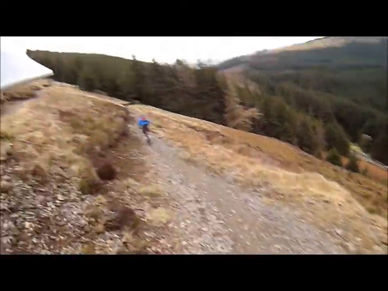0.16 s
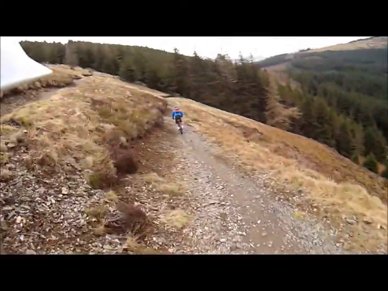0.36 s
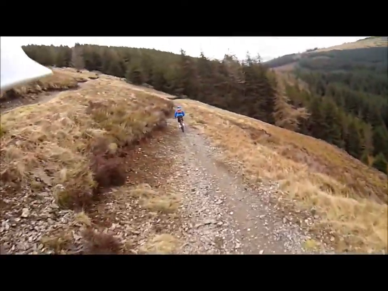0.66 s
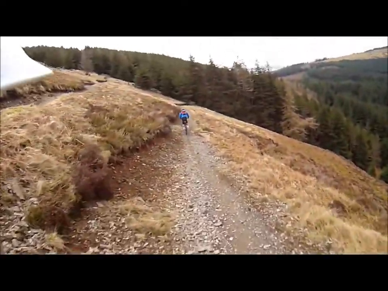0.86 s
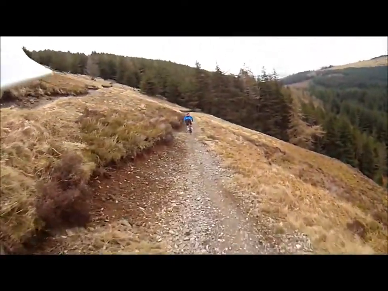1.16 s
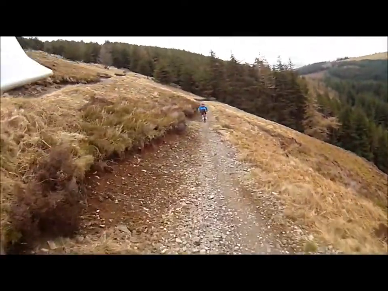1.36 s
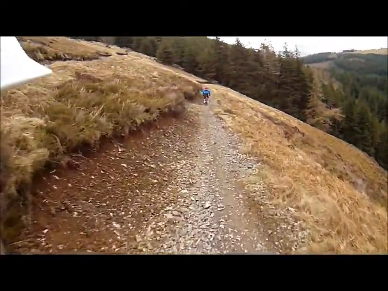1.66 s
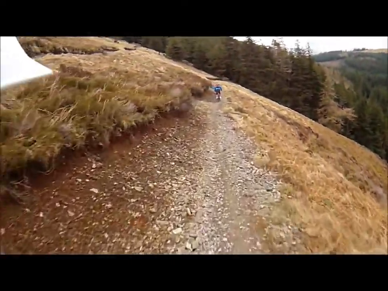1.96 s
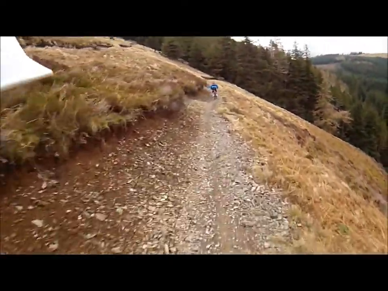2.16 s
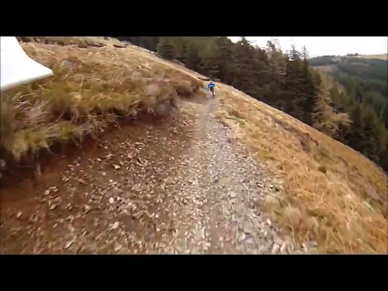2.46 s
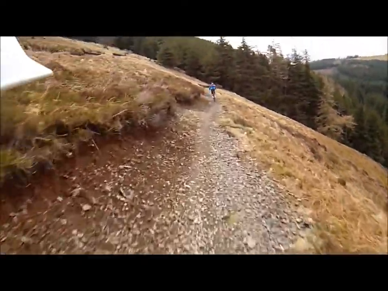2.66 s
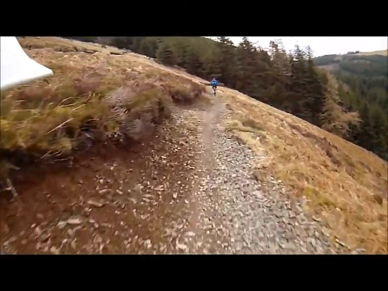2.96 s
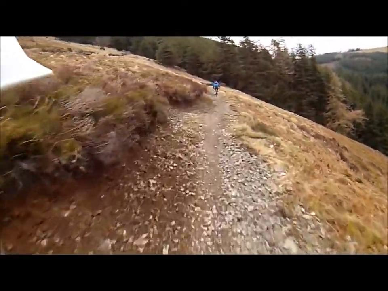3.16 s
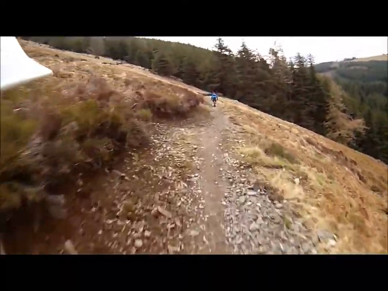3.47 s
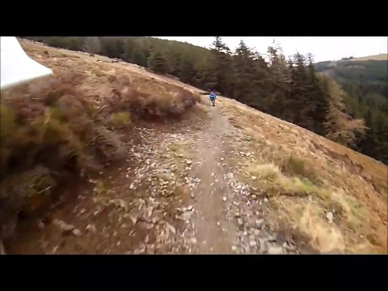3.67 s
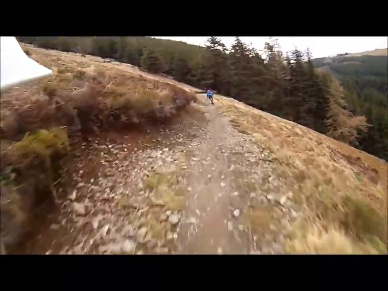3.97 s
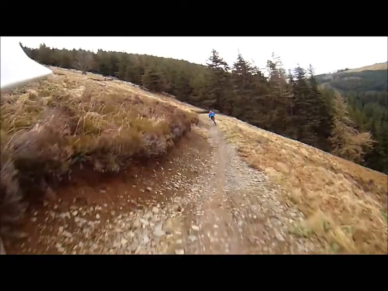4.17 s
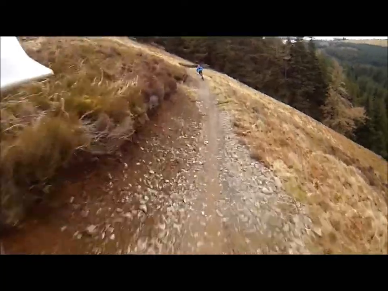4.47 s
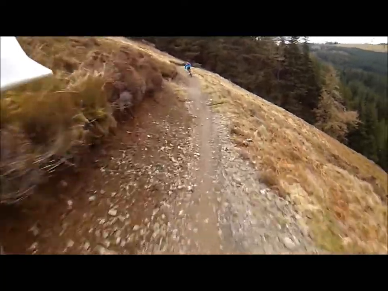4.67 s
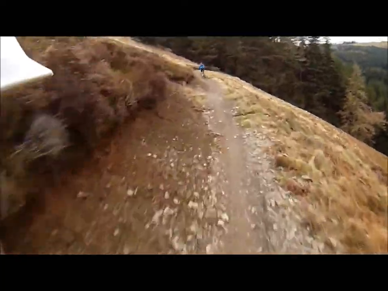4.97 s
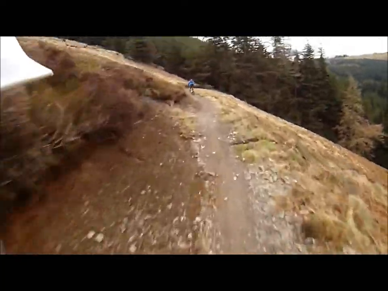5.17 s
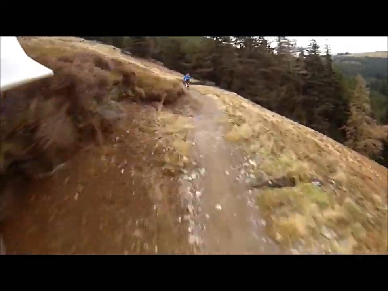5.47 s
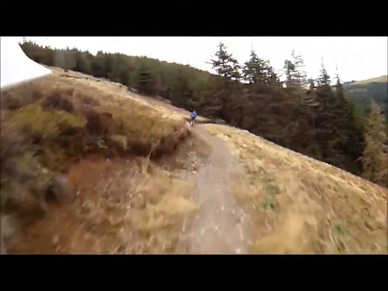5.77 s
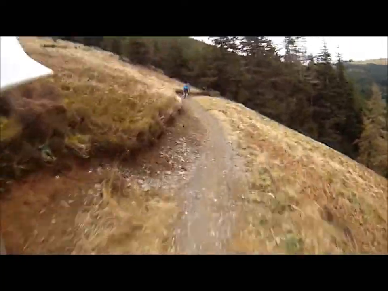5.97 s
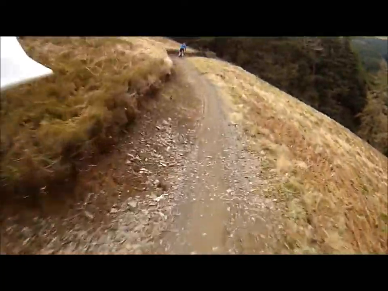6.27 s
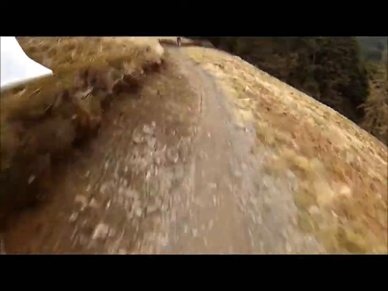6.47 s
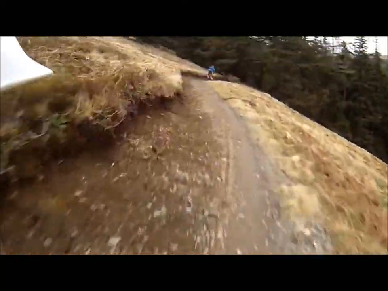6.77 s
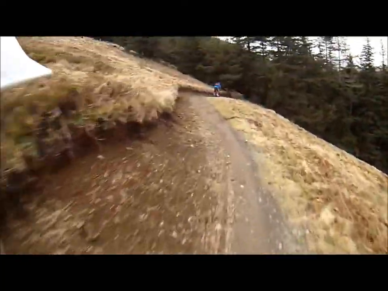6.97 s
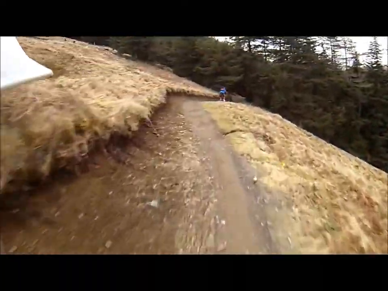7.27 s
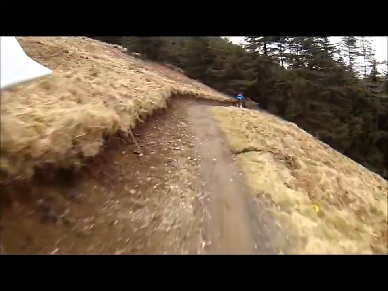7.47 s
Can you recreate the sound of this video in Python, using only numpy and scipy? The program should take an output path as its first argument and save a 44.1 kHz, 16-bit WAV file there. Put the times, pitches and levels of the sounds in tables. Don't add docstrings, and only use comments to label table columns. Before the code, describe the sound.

Heard from a helmet camera in a plastic case, a mountain bike rolls down an open hillside gravel trail. Quiet crunching and a thin ticking freewheel come first, then rougher, faster grinding with pebbles knocking the frame. Wind rumbles in gusts over faint hiss. Very loud stone cracks jump out midway and near the end, with a hard braking skid between them.

```python
import sys
import numpy as np
from scipy import signal
from scipy.fft import rfft, irfft
from scipy.io import wavfile
from scipy.ndimage import uniform_filter1d

SR = 44100
rng = np.random.default_rng(int(sys.argv[2]) if len(sys.argv) > 2 else 0)


def dump_mix(stems):
    frames = np.atleast_2d(stems).T
    limited = np.clip(frames, -1, 1)
    pcm = np.round(limited * 32767).astype(np.int16)
    wavfile.write(sys.argv[1], SR, pcm)


def elevation(decibels):
    levels = np.asarray(decibels, float)
    return 10 ** (levels / 20)


N = 336042
T = np.arange(N) / SR

# time in seconds, crunch level in dB.
CRUNCH = [(0.0, -65.5), (1.31, -66.5), (1.66, -61.5), (2.1, -59.5), (2.63, -60.5), (3.4, -55.5),
          (4.03, -56), (4.39, -59), (4.69, -60.5), (4.86, -52), (5.07, -53.5), (5.92, -56), (6.09, -59),
          (6.28, -58), (6.51, -54.5), (6.88, -51.5), (7.03, -53.5), (7.62, -56)]
# middle in seconds, swell in dB, half length in seconds.
SLIDES = [(0.316, 9.5, 0.039), (1.538, 2.5, 0.033), (1.935, 8, 0.0047), (2.09, 5.5, 0.02),
          (3.106, 11.5, 0.0077), (3.179, 5.5, 0.0094), (3.345, 5.5, 0.011), (3.435, 2, 0.011),
          (3.59, 4.5, 0.0084), (3.979, 7, 0.0036), (4.13, 6, 0.038), (4.693, 12, 0.051),
          (4.888, 1.5, 0.0086), (5.171, 11.5, 0.011), (5.275, 3, 0.0066), (5.85, 7.5, 0.011),
          (5.95, -0.5, .06), (6.423, 4.5, 0.053), (6.77, 2.5, 0.029)]
# frequency in Hz, width in Hz, level in dB.
CASE_LOW = [(1250, 370, -1), (1550, 510, 11.5), (1927, 160, -10)]
CASE_HIGH = [(2390, 290, 1.5), (2796, 250, 4), (3990, 350, 0.5), (4920, 73, -7.5)]
CASE_TOP = [(4900, 900, -10), (6900, 1500, 0), (9300, 530, -6), (11500, 2400, -13)]
# time in seconds, rush level in dB.
SPEED = [(0.0, -60), (2.06, -59.5), (2.16, -59), (3.22, -55), (4.05, -56.5), (6.15, -52), (6.43, -53),
         (7.0, -52.5), (7.62, -55)]
# middle in seconds, swell in dB, half length in seconds.
SKIDS = [
    (0, 9, .1),
    (2.04, 3, .08),
    (4.2, 4.5, 0.72),
    (5.95, 13, 0.13),
    (6.25, 4.5, .15),
    (7.0, 4, 0.19),
]
# middle in seconds, swell in dB, half length in seconds.
GUSTS = [(.06, 6, .04), (.6, 4, 0.26), (2.07, 12, 0.11), (2.55, 8, 0.31), (3.35, 9.5, 0.23),
         (3.95, 14, 0.19), (4.2, 8, 0.074), (4.76, 21, 0.043), (4.92, 10.5, 0.11), (5.3, 10, 0.74),
         (5.95, 10, 0.089), (6.08, 9, 0.029), (6.43, 3.5, 0.04), (6.7, 18, 0.15), (6.92, 8, 0.058),
         (7.15, 2, 0.024), (7.43, 6, 0.029)]
# frequency in Hz, density in dB per Hz.
BUFFET_SPECTRUM = [(4, -46), (7, 5), (22, 3), (31, -9), (40, -10.5), (55, -26), (90, -81.5)]
RUSH_SPECTRUM = [(22, -26), (38, -7.5), (54, -11.5), (91, -16), (151, -24.5), (309, -30.5), (700, -45.5),
                 (910, -70), (1540, -120)]
HISS_SPECTRUM = [(300, -24.5), (2000, -34), (6000, -33), (10000, -29), (16000, -31)]
# frequency in Hz, width in Hz, level in dB.
TYRE_MODES = [(122, 27, -6.5), (150.3, 26.5, -0.5)]
# start in seconds, peak in dB, ring in Hz.
KNOCKS = [(0.9532, -41, 1540), (0.9674, -39.5, 1480), (0.9992, -31.5, 1550), (1.6544, -37, 1350),
          (1.8043, -34.5, 1460), (2.1614, -30, 1750), (2.3245, -32.5, 1540), (2.383, -38, 1410),
          (2.597, -43, 1610), (2.9219, -38.5, 1580), (3.044, -25.5, 1750), (3.276, -35.5, 1530),
          (3.3909, -32, 1530), (3.4454, -33.5, 1440), (3.6298, -36, 1350), (3.7489, -35, 1690),
          (3.9727, -35.5, 1470), (4.4893, -38, 1340), (4.688, -34, 1510), (4.883, -36.5, 1650),
          (4.9516, -33, 1240), (5.0487, -30, 1460), (5.1102, -31, 1540), (5.1642, -27.5, 1540),
          (5.3359, -31.5, 1420), (5.476, -35.5, 1250), (5.5426, -33.5, 1420), (6.688, -35, 1360),
          (6.789, -29, 1440), (7.067, -28.5, 1390)]
# start in seconds, peak in dB.
TAPS = [(0.0054, -41.5), (0.3431, -48), (0.7168, -43.5), (1.5342, -43), (1.9305, -40), (2.0228, -42),
        (2.095, -46), (2.46, -50), (2.5226, -40.5), (2.6239, -45), (2.693, -41.5), (3.1844, -38),
        (3.5803, -43), (4.0604, -36.5), (4.723, -40), (4.8199, -39), (4.8372, -42), (5.036, -37),
        (5.0883, -39), (5.2673, -37), (5.6155, -37.5), (5.679, -36), (6.338, -36), (6.388, -35.5),
        (6.7645, -33), (6.7793, -30), (7.1757, -35), (7.3798, -37), (7.4674, -41), (7.547, -46)]
# time in seconds, teeth passed.
RATCHET = [(.015, 0), (.105, 2), (.185, 5), (.305, 8), (.485, 13), (.568, 15), (.717, 18), (.878, 22),
           (.936, 24), (1.11, 31), (1.2, 34), (1.297, 38), (1.61, 50)]
# frequency in Hz, level in dB, ring time in seconds.
PAWL_MODES = [(4200, 0, 0.017), (7170, -1, 0.014), (9000, -5.5, 0.0087)]
# start in seconds, peak in dB, centre in Hz.
CHIPS = [(0.184, -53.5, 5100), (1.1962, -61, 7300), (2.0036, -48.5, 5190), (2.0956, -54, 5070),
         (2.161, -47.5, 6600), (2.3254, -50.5, 5070), (2.6234, -56, 5250), (3.097, -39.5, 4720),
         (3.1084, -50, 5220), (3.224, -55, 5080), (3.275, -51, 5240), (3.3912, -47.5, 6680),
         (3.477, -50, 5020), (3.6303, -40.5, 5080), (3.8292, -57, 7160), (3.909, -52, 5610),
         (4.4687, -56, 5780), (4.6869, -40.5, 5030), (4.739, -47, 6900), (4.8204, -36.5, 5800),
         (4.9562, -55, 5100), (5.0478, -42, 5160), (5.1696, -41, 6470), (6.3362, -47, 5400),
         (6.3844, -56, 5100), (6.4258, -56, 7400), (6.4378, -50, 5190), (6.79, -47, 6950),
         (7.437, -54, 6660)]
# start in seconds, peak in dB, centre in Hz.
PINGS = [
    (5.1936, -50, 8100),
    (5.444, -51, 9200),
    (6.4916, -47, 10300),
    (6.5854, -58, 10300),
    (6.6378, -49, 9980),
]
# start in seconds, peak in dB, ring in Hz, ring time in seconds.
TINKS = [
    (.237, -59, 3000, .02),
    (1.3597, -47.5, 1890, 0.031),
    (1.376, -52, 1850, .02),
]
# start in seconds, peak in dB, ring in Hz, ring time in seconds.
THUDS = [
    (3.013, -40, 480, 0.015),
    (6.011, -36.5, 956, 0.023),
    (6.04, -41.5, 710, 0.017),
    (3.662, -38.5, 219, 0.01),
    (4.101, -38.5, 85, 0.04),
    (4.36, -45, 90.5, 0.083),
    (4.755, -38.5, 45, .1),
    (6.075, -33.5, 48, 0.13),
]
# start in seconds, peak in dB, contact in seconds.
CRACKS = [
    (3.6619, -1, .00005),
    (4.1005, -7, 0.0003),
    (5.3805, -13, 0.00034),
    (7.0128, 0.6, 0.00015),
]
# frequency in Hz, level in dB, ring time in seconds.
CRACK_1_MODES = [(837, -42, 0.021), (1240, -33, 0.015), (1750, -34, 0.01), (2220, -38, .012),
                 (2877, -31.5, 0.011), (3830, -34.5, 0.0077), (4830, -37, 0.0038), (6630, -43, 0.0044),
                 (7790, -44.5, 0.0045), (9760, -47, 0.0026), (11700, -52, 0.0028), (13600, -56, 0.0022),
                 (14700, -56, .003)]
CRACK_2_MODES = [(160, -24, 0.11), (457, -43, 0.075), (802, -36, 0.043), (1040, -37.5, 0.022),
                 (1240, -32.5, 0.021), (1580, -33.5, 0.011), (1920, -36, 0.011), (2750, -41.5, 0.014),
                 (3180, -42, 0.0092), (3680, -44, 0.0083), (4770, -63, 0.0092), (5800, -77, .004),
                 (6750, -72, 0.0076)]
CRACK_3_MODES = [(1250, -38.5, 0.005), (1750, -28.5, 0.0061), (2320, -36, 0.0076), (2900, -41, 0.012),
                 (4140, -71, .008)]
CRACK_4_MODES = [(1150, -37, 0.022), (1540, -37.5, 0.009), (2073, -21, 0.011), (2940, -25, 0.005),
                 (3580, -38.5, 0.011), (4490, -29, 0.0038), (5870, -36.5, 0.0042), (6620, -33, 0.0028),
                 (7860, -47, 0.0031), (9000, -53, 0.0053), (10600, -53, 0.0078), (11800, -46.5, .003),
                 (14600, -52, .004), (15800, -63, .003)]

GRIT_DB, GRIT_DB_PER_DB = -67.5, 0.83
SPRAY_DB, SPRAY_DB_PER_DB = -79.5, 0.61
PEBBLES_PER_S, PEBBLE_DB = 140, -5
SKID_DB, SKID_DB_PER_DB = -72, 0.9
BUFFET_DB, BUFFET_DB_PER_DB = -49.5, 0.17
GUST_RUSH_SHARE = 0.05
TYRE_DB, TYRE_RISE_DB_PER_S = -74, 2.3
MOUNT_HZ, MOUNT_DB = 59.8, -65.5
TAP_HZ, TAP_SPREAD_RATIO, KNOCK_CONTACT_S = 1437, 0.02, 0.00035
BOUNCE_S, BOUNCE_DB = 0.005, -11
PAWL_DB, PAWL_SPREAD_DB = -64, 2
CHIP_S, CHIP_WIDTH_HZ = 0.016, 1360
CHIP_CASE_DB, CHIP_LOUD_DB = -4, -51
CHIP_DRY_DB_PER_DB = 0.46
CASE_HOLLOW_HZ, CRACK_HOLLOW_HZ, CRACK_LOW_HZ = 3510, 3130, 600
HISS_DB, WHINE_HZ, WHINE_DB = -76.5, 7630, -81
CLIP_PEAK, TOP_HZ = 0.99, 15750


def unit(x):
    return x / np.sqrt(np.mean(x ** 2))


def curve(table):
    s, db = np.transpose(table)
    return np.interp(T, s, db)


def swells(table):
    return sum(db * np.exp(-((T - s) / half_s) ** 2) for s, db, half_s in table)


def walk(rate_hz):
    hold = int(SR / rate_hz)
    steps = np.repeat(rng.standard_normal(N // hold + 1), hold)
    return 1.48 * uniform_filter1d(uniform_filter1d(steps, hold), hold)[:N]


def coloured(spectrum):
    hz, db = np.transpose(spectrum)
    f = np.arange(N // 2 + 1) * SR / N + 0.0017
    gain = elevation(np.interp(np.log(f), np.log(hz), db))
    return unit(irfft(rfft(rng.standard_normal(N)) * gain, N))


def resonate(x, modes):
    f = np.arange(N // 2 + 1) * SR / N + 1e-3
    gain = 0
    for hz, width_hz, db in modes:
        detune = (f / hz - hz / f) * hz / (1.62 * width_hz)
        gain = gain + elevation(db) / (1 + 1j * detune) ** 2
    return unit(irfft(rfft(x) * gain, N))


def hollow(x, hz, sharpness, depth):
    notched = signal.lfilter(*signal.iirnotch(hz, sharpness, fs=SR), x)
    return (1 - depth) * x + depth * notched


def ring(modes, contact_s):
    t = T[:SR // 12]
    y = np.zeros(len(t))
    for k, (hz, db, t60_s) in enumerate(modes):
        decay = np.exp(-np.log(1000) * t / t60_s)
        y += (-1) ** k * elevation(db) / t60_s * decay * np.sin(2 * np.pi * hz * t)
    y = y * (1 - np.exp(-t / contact_s))
    return y / np.max(np.abs(y))


def scratch(noise, hz, width_ratio, length_s):
    edges_hz = [(1 - width_ratio) * hz, (1 + width_ratio) * hz]
    band = signal.butter(2, edges_hz, "bandpass", fs=SR, output="sos")
    t = T[:len(noise)]
    envelope = np.exp(-np.log(1000) * t / length_s) * (1 - np.exp(-t / 0.00023))
    y = signal.sosfilt(band, noise) * envelope
    return y / np.max(np.abs(y))


def add(out, s, sound):
    i = int(s * SR)
    out[i:i + len(sound)] += sound[:N - i]


def grains(per_s, spread_db, length_s, smooth):
    hit = rng.random(N) < per_s / SR
    sizes = hit * elevation(spread_db * np.minimum(rng.exponential(size=N), 3.2))
    bursts = signal.lfilter([1], [1, -np.exp(-1 / (length_s * SR))], sizes)
    return rng.standard_normal(N) * (unit(bursts) + smooth)


def gravel():
    crunch_db, slide_db = curve(CRUNCH), swells(SLIDES)
    grit_db = GRIT_DB + GRIT_DB_PER_DB * (crunch_db + 57.5)
    spray_db = SPRAY_DB + SPRAY_DB_PER_DB * (crunch_db + 60.5)
    stones = unit(grains(per_s=340, spread_db=2.5, length_s=0.0011, smooth=1.5))
    sand = unit(grains(per_s=270, spread_db=1.0, length_s=0.0038, smooth=0.35))
    pebbles = unit((rng.random(N) < PEBBLES_PER_S / SR) * rng.uniform(-1.02, 1, size=N))
    patch_db = 0.62 * walk(30)
    crunch = resonate(stones + elevation(PEBBLE_DB) * pebbles, CASE_LOW)
    crunch *= elevation(crunch_db + slide_db + 1.35 + 1.76 * walk(70))
    grit = resonate(0.3 * stones + 0.12 * pebbles + sand, CASE_HIGH)
    grit *= elevation(grit_db + 0.71 * slide_db - 0.34)
    spray = resonate(0.168 * stones + sand, CASE_TOP)
    spray *= elevation(spray_db + 0.4 * slide_db + 1.7)
    return elevation(patch_db) * (crunch + grit + spray)


def skid():
    skid_db = SKID_DB + SKID_DB_PER_DB * (curve(SPEED) + 54.5) + swells(SKIDS)
    modes = [(410, 210, -1.0), (578, 580, 0.24), (920, 650, -1.2)]  # Hz, width Hz, dB
    return resonate(rng.standard_normal(N), modes) * elevation(skid_db + 2.0)


def wind():
    speed_db, gust_db = curve(SPEED), swells(GUSTS)
    rush_db = speed_db + GUST_RUSH_SHARE * gust_db + 1.0
    buffet_db = BUFFET_DB + BUFFET_DB_PER_DB * (speed_db + 56.5) + gust_db
    rush = coloured(RUSH_SPECTRUM) * elevation(rush_db + 2.5 + 1.0 * walk(23))
    return coloured(BUFFET_SPECTRUM) * elevation(buffet_db + 5.0) + rush


def tyres():
    drone_db = TYRE_DB + TYRE_RISE_DB_PER_S * T + 1.65 * walk(6.6)
    drone = resonate(rng.standard_normal(N), TYRE_MODES) * elevation(drone_db)
    hum = resonate(rng.standard_normal(N), [(MOUNT_HZ, 7, 0)]) * elevation(MOUNT_DB)
    return drone + hum


def knocks():
    out = np.zeros(N)
    hits = list(KNOCKS)
    for (s, db), chance in zip(TAPS, rng.standard_normal(len(TAPS))):
        hits.append((s, db, TAP_HZ * (1 + TAP_SPREAD_RATIO * chance)))
    bounces = []
    for (s, db, hz), (a, b) in zip(hits, rng.random((len(hits), 2))):
        bounces.append((s + BOUNCE_S * (0.609 + a), db + BOUNCE_DB - 6 * b, hz * (0.95 + 0.2 * b)))
    for s, db, hz in hits + bounces:
        modes = [(0.8 * hz, -7, 0.009), (hz, 0, 0.011), (1.196 * hz, -5, 0.009),
                 (2850, -17, 0.009), (4050, -29, 0.008)]
        add(out, s + 0.0006, elevation(db - 0.4) * ring(modes, KNOCK_CONTACT_S))
    return out


def freewheel():
    out, tick = np.zeros(N), ring(PAWL_MODES, 0.00017)
    s, teeth = np.transpose(RATCHET)
    times = np.interp(np.arange(teeth[-1]), teeth, s)
    for start, chance in zip(times, rng.standard_normal(len(times))):
        add(out, start, elevation(PAWL_DB + PAWL_SPREAD_DB * chance) * tick)
    return out


def chips():
    out = np.zeros(N)
    hits = list(CHIPS) + list(PINGS)
    for (s, db, hz), noise in zip(hits, rng.standard_normal((len(hits), SR // 20))):
        case_db = CHIP_CASE_DB - CHIP_DRY_DB_PER_DB * (db - CHIP_LOUD_DB) - 9 * (hz > 8000)
        case = scratch(noise, 4100, 0.081, 1.2 * CHIP_S)
        case += 0.39 * scratch(noise, 2900, 0.29, 0.55 * CHIP_S)
        chip = scratch(noise, hz, CHIP_WIDTH_HZ / hz, CHIP_S) + elevation(case_db) * case
        add(out, s + 0.00041, elevation(db - 1.3) * chip)
    return out


def tinks():
    out = np.zeros(N)
    for s, db, hz, t60_s in TINKS:
        add(out, s, elevation(db) * ring([(hz, 0, t60_s)], 0.0012))
    return out


def thuds():
    out = np.zeros(N)
    for s, db, hz, t60_s in THUDS:
        modes = [(hz, 0, t60_s), (1.7 * hz, -3, t60_s)]
        add(out, s, elevation(db + 1.0) * ring(modes, 0.00053))
    return out


def cracks():
    out = np.zeros(N)
    stones = (CRACK_1_MODES, CRACK_2_MODES, CRACK_3_MODES, CRACK_4_MODES)
    for (s, db, contact_s), modes in zip(CRACKS, stones):
        add(out, s, elevation(db) * ring(modes, contact_s))
    out = signal.sosfilt(signal.butter(2, CRACK_LOW_HZ, "highpass", fs=SR, output="sos"), out)
    out = hollow(out, CRACK_LOW_HZ, 3.7, depth=0.53)
    return hollow(out, CRACK_HOLLOW_HZ, 18, depth=0.7)


def scene():
    ground = hollow(gravel() + skid(), CASE_HOLLOW_HZ, 4.2, depth=0.36)
    air = wind() + tyres()
    strikes = knocks() + freewheel() + chips() + tinks() + thuds() + cracks()
    return (ground + air + strikes)[None]


def low_pass(x):
    return signal.sosfilt(signal.butter(12, 16640, fs=SR, output="sos"), x)


def record(dry):
    hiss = elevation(HISS_DB) * coloured(HISS_SPECTRUM)
    whine = np.sqrt(2) * elevation(WHINE_DB) * np.sin(2 * np.pi * WHINE_HZ * T)
    top = signal.ellip(10, 0.3, 60, TOP_HZ, fs=SR, output="sos")
    mix = signal.sosfilt(top, np.clip(dry, -CLIP_PEAK, CLIP_PEAK) + hiss + whine)
    return low_pass(mix)


dry = scene()
out = record(dry)
dump_mix(out)
```